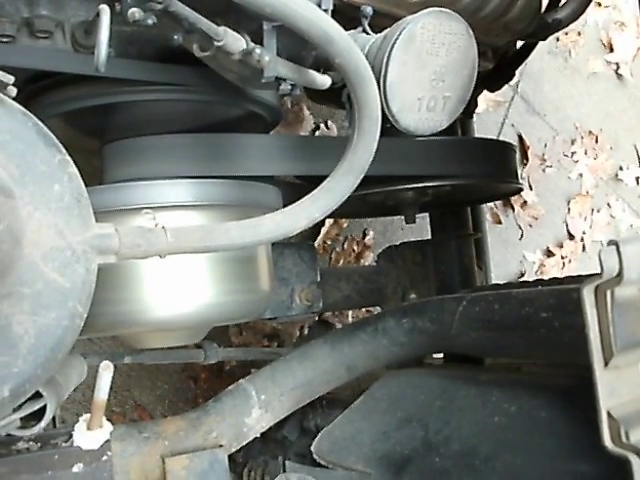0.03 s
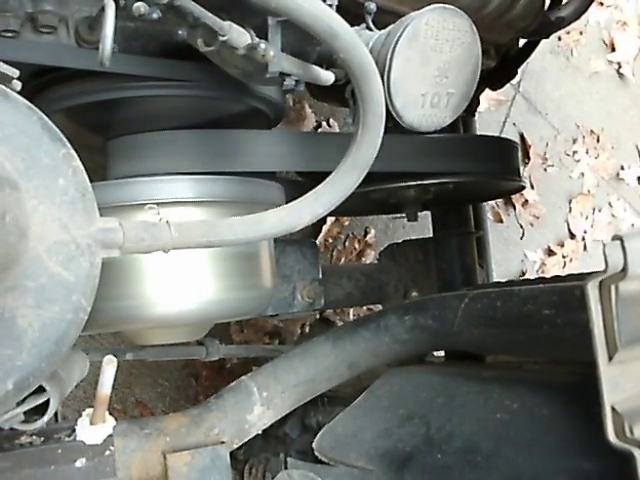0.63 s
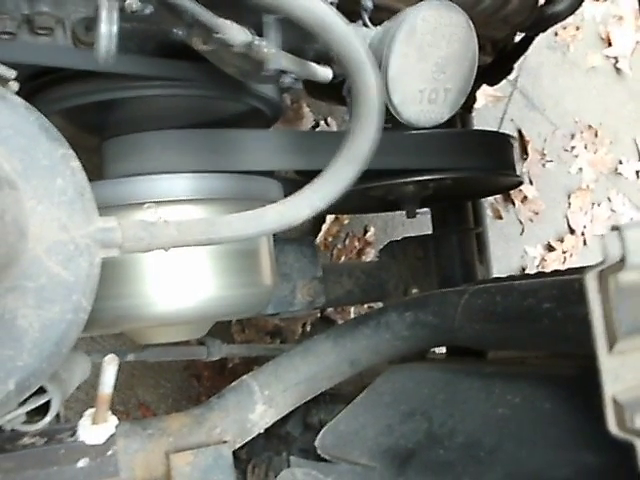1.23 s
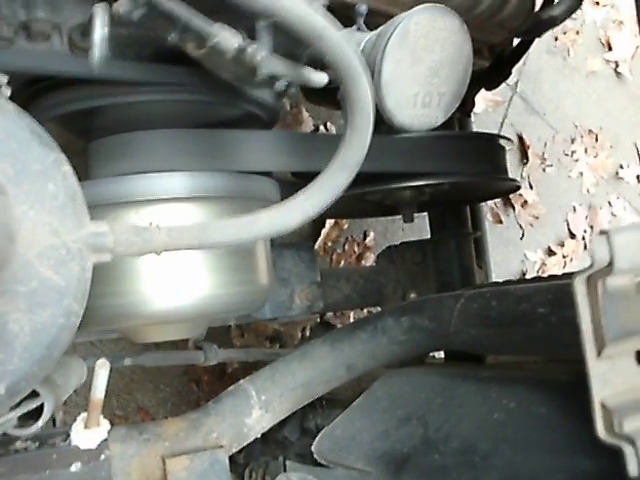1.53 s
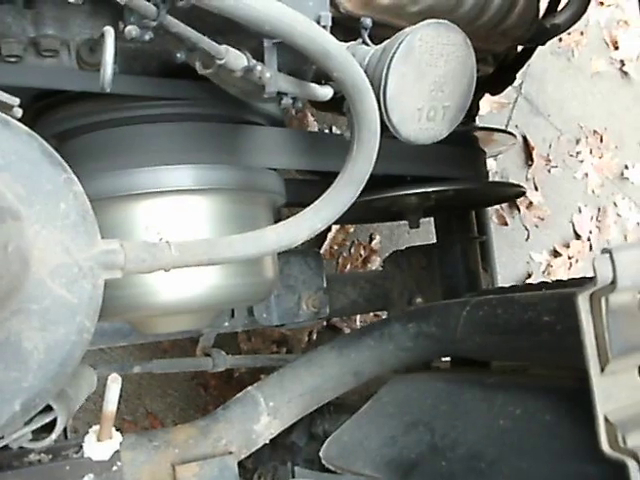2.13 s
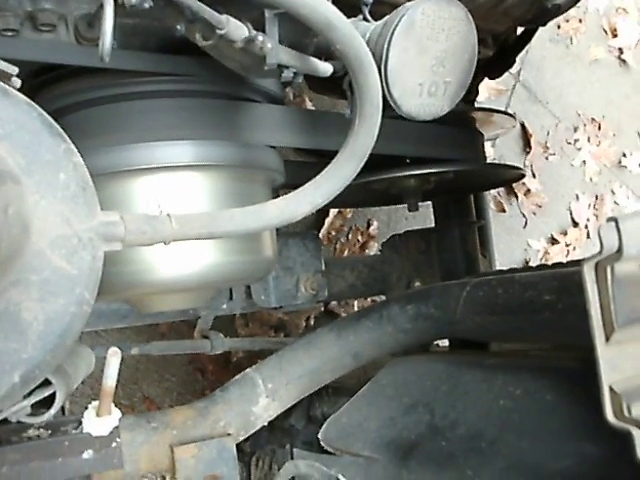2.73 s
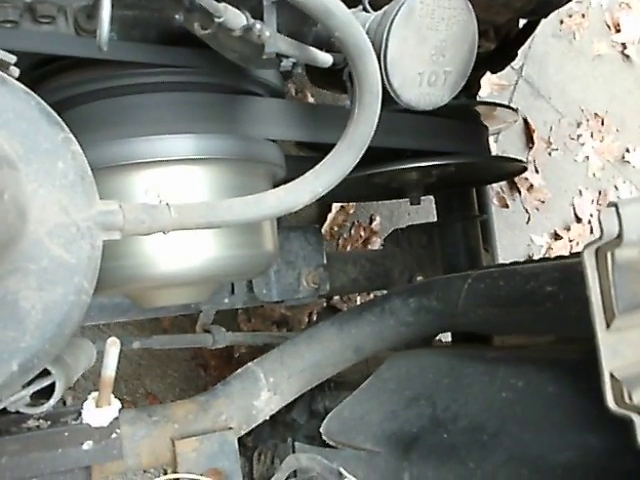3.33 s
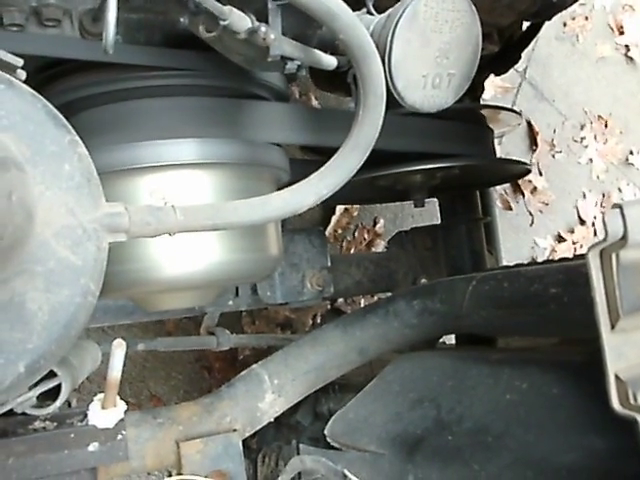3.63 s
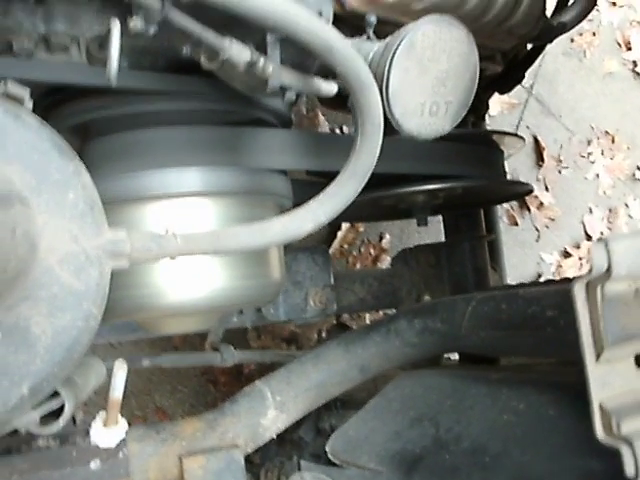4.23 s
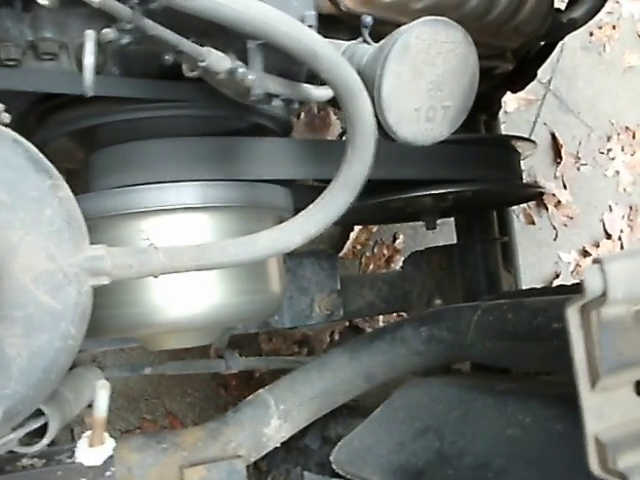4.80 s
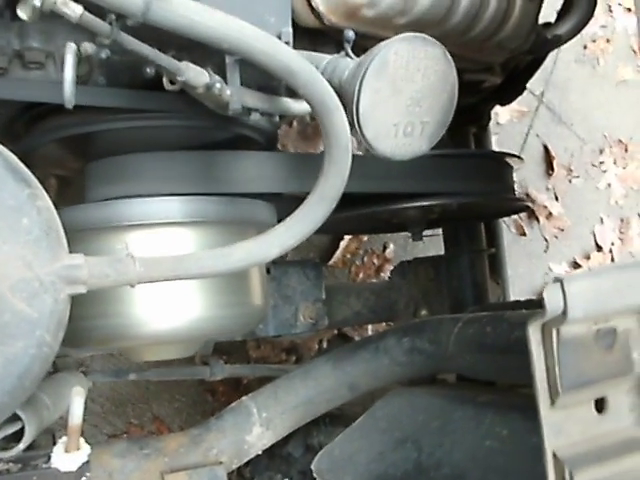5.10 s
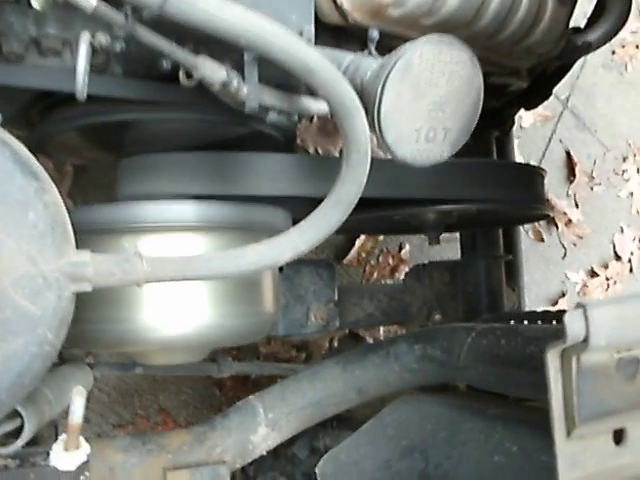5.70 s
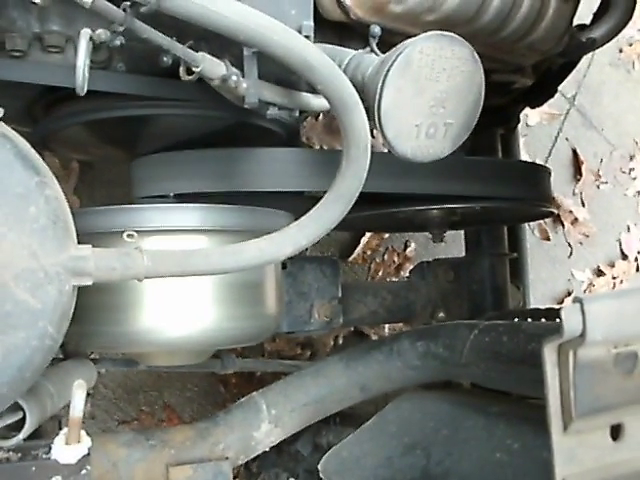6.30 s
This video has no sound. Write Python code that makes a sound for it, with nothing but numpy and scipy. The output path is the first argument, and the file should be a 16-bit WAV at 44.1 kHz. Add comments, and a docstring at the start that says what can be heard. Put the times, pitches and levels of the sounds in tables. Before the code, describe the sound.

Close up, a small engine chugs over, catches with a loud, short rev, then winds down, rattling and knocking to a stop.

```python
"""Golf cart engine, start and coast-down

A single-cylinder four-stroke, heard from just above its belt drive, is cranked, fires and revs for a
second, then coasts with the ignition off. Valve impacts and combustion excite the modes of the case,
air pulses ring the air box and muffler, and at low speed the slack belt drive knocks in the clutches.
The sound is close and dull, and overloads on the firings."""
import sys
import numpy as np
from scipy import signal
from scipy.io import wavfile

SR = 44100
rng = np.random.default_rng(int(sys.argv[2]) if len(sys.argv) > 2 else 0)


def wav_out(sig):
    """Save sig, one row per channel (or a flat mono array), as 16-bit PCM at SR to the path in sys.argv[1]."""
    wavfile.write(sys.argv[1], SR, np.round(np.clip(np.atleast_2d(sig).T, -1, 1) * 32767).astype(np.int16))


N = 288855
T = np.arange(N) / SR

# engine speed, two crank turns to a cycle: (time [s], speed [cycles/s])
SPEED = [(0, 9.646), (.573, 7.365), (1.0, 8.61), (1.03, 9.44), (1.207, 13.484), (1.567, 21.375),
         (1.852, 27.063), (2.009, 25.292), (2.67, 19.847), (3.304, 16.404), (3.694, 14.208), (4.899, 8.775),
         (5.75, 5.092), (6.174, 3.077), (6.36, 2.5), (6.44, .6)]
# spectrum of bright metal contact: (frequency [Hz], level [dB])
CLACK = [(400, -18.5), (1000, -10), (1700, -5), (2200, -1.5), (2650, 0), (3100, 2.5), (3550, -1),
         (3900, -10), (4400, -14.5), (5000, -31.5)]


def amp(db):
    """Amplitude grows tenfold with every 20 dB."""
    return 10 ** (np.asarray(db) / 20)


def unit_rms(x):
    """Normalisation to unit mean power."""
    return x / np.sqrt(np.mean(x ** 2) + 1e-20)


def over_time(rows):
    """Linear interpolation of a time table at every sample."""
    return np.interp(T, *np.transpose(rows))


def speed_gain(rows, column=1):
    """Gain interpolated from a table of levels against engine speed."""
    rows = np.asarray(rows)
    return amp(np.interp(over_time(SPEED), rows[:, 0], rows[:, column]))


def speed_law(db, per_octave_db):
    """Power law of speed: a gain of db at 10 cycles/s, with a constant step per doubling."""
    return amp(db + per_octave_db * np.log2(over_time(SPEED) / 10))


def load_gain(full_db):
    """Level rises in proportion to the pull on the belt, by full_db at full load."""
    # pull of the starter, then of the firing engine: (time [s], load [0-1])
    load = [(0, 0.51), (.3, 0.54), (.6, 0.17), (.85, 0.67), (1.3, 0.7), (1.6, 0.37), (2.2, 0.11), (2.6, 0)]
    return amp(full_db * over_time(load))


def throttle():
    """Gain of the suction, zero while the throttle is shut."""
    # suction through the throttle: (time [s], level [dB])
    suction = [(.9, -25), (1.05, -16), (1.25, -4.5), (1.5, -9), (1.75, -11.5), (1.9, -14), (1.94, -30)]
    return amp(over_time(suction)) * (T > suction[0][0]) * (T < suction[-1][0])


def combustion():
    """Gain of the pressure pulses, zero while the ignition is off."""
    # combustion strength, easing as speed builds: (time [s], level [dB])
    strength = [(1.0, 4.5), (1.3, 3), (1.54, -3), (1.64, -5.5), (1.85, -9.5)]
    ignition = (T > strength[0][0] - .04) & (T < strength[-1][0] + .02)
    return ignition * amp(over_time(strength))


def cycles():
    """Phase, in engine cycles, is the integral of speed."""
    return -.271 + np.cumsum(over_time(SPEED)) / SR


def strokes(phase, scatter_db):
    """Phase-locked impulse train: one uneven pulse per cycle."""
    at = np.flatnonzero(np.diff(np.floor(cycles() - phase)) > 0)
    train = np.zeros(N)
    train[at] = amp(scatter_db * rng.standard_normal(100)[:len(at)])
    return train


def grit(per_s, spread_db):
    """Shot noise: dense, tiny contacts of random size and sign."""
    size = amp(spread_db * np.clip(rng.standard_normal(N), -2, 2))
    return unit_rms(size * rng.choice([-1, 1], N) * (rng.random(N) < per_s / SR))


def chatter(blows, rise_s, decay_s, tail_db, tail_s):
    """Incoherent envelopes add in power: each blow gives a burst, then a slower tail as the body rings on."""
    t = T[:SR // 5]
    shape = (1 - np.exp(-t / rise_s)) * (np.exp(-t / decay_s) + amp(tail_db) * np.exp(-t / tail_s))
    power = signal.oaconvolve(blows ** 2, (shape / shape.max()) ** 2)[:N]
    return np.sqrt(abs(power))


def casing(x, spectrum):
    """Structural resonance: a unit-energy, minimum-phase filter adds modes to a broad spectrum."""
    # modes and notches of crankcase, clutch and covers: (frequency [Hz], width [Hz], gain [dB])
    modes = [(322, 20, 5), (375, 25, 4), (462, 20, 4), (525, 25, 7), (650, 40, 2), (850, 60, 4.5),
             (992, 50, 3), (1236, 45, 5), (1501, 40, 5), (1875, 35, -5), (1930, 40, 8), (2010, 35, 5),
             (2075, 45, -3), (2208, 45, 6), (2260, 35, 3), (2370, 50, 2), (2920, 40, 3), (3026, 65, 7),
             (3267, 60, 4), (3566, 60, 4), (3650, 40, 3), (3890, 70, 3), (4190, 50, -4), (4420, 70, 5)]
    size = 8192
    hz = abs(np.fft.fftfreq(size, 1 / SR))
    knots_hz, knots_db = np.transpose(spectrum)
    db = np.interp(np.log(hz + 1), np.log(knots_hz), knots_db)
    db += sum(peak / (1 + (2 * (hz - centre) / width) ** 2) for centre, width, peak in modes)
    response = np.exp(np.conj(signal.hilbert(np.log(amp(db)))))
    ring = np.fft.ifft(response).real[:size // 2]
    return signal.oaconvolve(x, ring / np.linalg.norm(ring))[:N]


def resonator(drive, modes):
    """Modal superposition: each impulse rings damped sinusoids, the wider modes dying sooner."""
    t = T[:SR // 4]
    ring = sum(amp(db) * np.exp(-np.pi * width * t) * np.sin(2 * np.pi * hz * t)
               for hz, width, db in modes)
    onset = 1 - np.exp(-t / .0058)
    return signal.oaconvolve(drive, ring * onset)[:N]


def impact(clack, thud):
    """Impact excitation: a short clack, brighter at speed, and a longer thud of the case."""
    # spectrum of the clack at low speed: (frequency [Hz], level [dB])
    slow_spectrum = [(400, -22), (1000, -4), (1450, -3), (1750, -2.5), (2200, 2.5), (2650, -1), (3100, 1.5),
                     (3550, -2.5), (3900, -7.5), (4400, -13.5), (5000, -35)]
    # spectrum of the thud: (frequency [Hz], level [dB])
    thud_spectrum = [(150, -37.5), (320, -13), (500, -11.5), (680, -3.5), (900, 0), (1100, -0.5),
                     (1330, -6), (1550, -12.5), (1750, -28), (2600, -39)]
    bright = grit(per_s=12000, spread_db=2)
    bright *= chatter(clack, rise_s=.00058, decay_s=.0094, tail_db=-22, tail_s=.014)
    dull = grit(per_s=8000, spread_db=2)
    dull *= chatter(thud, rise_s=.0014, decay_s=.015, tail_db=-17.5, tail_s=.028)
    slow_share = np.clip(7.75 / over_time(SPEED), 0, 1) ** 2  # 1 below 7.75 cycles/s
    clacks = casing(bright * slow_share, slow_spectrum) + casing(bright * (1 - slow_share), CLACK)
    return clacks + casing(dull, thud_spectrum)


def churn():
    """Friction noise of belt and gears, modulated as compression slows the crank in each cycle."""
    # friction: (speed [cycles/s], rumble level [dB], belt level [dB], gear level [dB])
    levels = [(1, -32, -25, -32.5), (2.85, -34.5, -19.5, -35), (6, -28.5, -15, -28),
              (10.5, -29.5, -13, -23), (16.8, -27.5, -18, -23), (25.4, -25, -10.5, -16)]
    # spectrum of the rumble: (frequency [Hz], level [dB])
    rumble_spectrum = [(15, -25), (40, -10), (100, -5.5), (180, 1.5), (260, -7.5), (400, -7), (600, -8),
                       (900, -44.5)]
    # spectrum of the belt: (frequency [Hz], level [dB])
    belt_spectrum = [(150, -39.5), (350, -10), (500, -6.5), (680, 0.5), (900, -1.5), (1100, -1),
                     (1330, -8.5), (1550, -14), (1750, -33.5), (2600, -37)]
    surge = np.cos(2 * np.pi * (cycles() - .53))
    belt = speed_gain(levels, 2) * load_gain(4.5) * amp(.22 * surge) * grit(per_s=3000, spread_db=1.5)
    gears = speed_gain(levels, 3) * load_gain(5.5) * amp(.85 * surge) * grit(per_s=4000, spread_db=2)
    rumble_gain = (speed_gain(levels, 1) + amp(-7) * throttle()) * amp(1.9 * surge)
    rumble = casing(rumble_gain * grit(per_s=3600, spread_db=3), rumble_spectrum)
    return rumble + amp(-4) * casing(belt, belt_spectrum) + amp(-8) * casing(gears, CLACK)


def shake():
    """Forced vibration: the unbalance of crank and piston drives harmonics of the rotation."""
    # shaking on resonant mounts: (speed [cycles/s], once-a-turn level [dB], twice-a-turn level [dB])
    levels = [(3, -73, -68.5), (9, -57.5, -52.5), (13.5, -57, -39), (17.5, -38, -34.5), (22.2, -45, -37),
              (25.5, -46, -27)]
    crank = 4 * np.pi * cycles()
    once = speed_gain(levels, 1) + speed_law(db=-44, per_octave_db=21) * throttle()
    twice = speed_gain(levels, 2) + amp(-21) * throttle()
    overtones = amp(-10) * np.cos(3 * crank) + amp(-7) * np.cos(4 * crank)
    return np.sqrt(2) * (-once * np.sin(crank) + twice * (np.cos(2 * crank) + overtones))


def clutch():
    """Frictional excitation: the belt keeps the sheaves ringing, and slips once with a squeak."""
    # belt friction: (speed [cycles/s], level [dB])
    rubbing = [(5, -50.5), (13, -21.5), (18, -25), (23, -17.5), (27, -15)]
    # modes of the sheaves: (frequency [Hz], width [Hz], level [dB])
    sheaves = [(521, 130, -2), (848, 78, 3), (1256, 66, 0), (1316, 48, -10.5), (1483, 57, -10.5),
               (1607, 45, -15)]
    # belt squeak: (start [s], length [s], frequency [Hz], level [dB])
    squeak = (.652, .04, 1595, -22)
    ringing = unit_rms(resonator(grit(per_s=2200, spread_db=5), sheaves))
    ringing *= speed_gain(rubbing) * load_gain(8.5)
    start, length, hz, db = squeak
    swell = np.sin(np.pi * np.clip((T - start) / length, 0, 1))
    return ringing + amp(db) * swell * np.sqrt(2) * np.sin(2 * np.pi * hz * T)


def airflow():
    """Cavity resonance: gulps ring the air box under throttle; exhaust puffs ring the muffler."""
    # modes of air box and pipe: (frequency [Hz], width [Hz], level [dB])
    airbox = [(67, 43, 3), (103, 91, 4), (174.2, 28.3, 5), (203, 27, -2.5), (533, 27, -5.5),
              (868, 20, -7.5)]
    # modes of the muffler: (frequency [Hz], width [Hz], level [dB])
    muffler = [(60.4, 26, -14.5), (110, 35, -5), (173.4, 48, 5), (231, 24, -16), (306, 86, -25.5)]
    gulps = strokes(phase=.775, scatter_db=.5)
    overlap = strokes(phase=.5, scatter_db=1)
    blowdown = strokes(phase=.26, scatter_db=1.5)
    pumping = speed_law(db=-16.5, per_octave_db=1) * load_gain(14.5) + amp(-5) * combustion()
    intake = amp(7) * resonator(throttle() * gulps, airbox)
    return intake + resonator(pumping * (overlap + amp(-6) * blowdown), muffler)


def knocks():
    """Backlash: slack in the clutches is taken up with a blow, mostly as compression stalls the crank."""
    # take-ups of slack: (time [s], clack level [dB], thud level [dB])
    take_ups = [(0.142, -17, -11.5), (0.371, -21, -9.5), (0.5, -19.5, -15), (.635, -11, -13.5),
                (0.764, -11, -4.5), (0.884, -17.5, -19), (5.456, -16.5, -11), (5.613, -18.5, -11.5),
                (5.817, -13.5, -3), (6.035, -23, -12.5), (6.057, -10.5, -3), (6.365, -17.5, -16.5),
                (6.39, -34, -15), (6.481, -30, -21)]
    times, clack_db, thud_db = np.transpose(take_ups)
    at = (times * SR).astype(int)
    clack, thud = np.zeros((2, N))
    clack[at], thud[at] = amp(clack_db), amp(thud_db)
    return impact(clack, thud)


def valves():
    """Periodic impacts: valves open and seat at set phases, the main blows harder under load."""
    # valve train blows: (phase [0-1], clack level [dB], thud level [dB], gain at full load [dB])
    timing = [(0.218, -6, -10.5, -2), (.43, -6, -8, 8.5), (0.535, 2.5, 2, 8), (0.719, -3, 0.5, 9.5),
              (.885, -9, -6.5, 2)]
    # force of the blows, greatest when slow: (speed [cycles/s], clack gain [dB], thud gain [dB])
    force = [(2.46, -12.5, -10.5), (4.85, -15.5, -14), (9.15, -15, -17.5), (17.1, -19, -20),
             (27, -21.5, -24.5)]
    clack, thud = np.zeros((2, N))
    for phase, clack_db, thud_db, load_db in timing:
        blows = strokes(phase, scatter_db=1.5) * load_gain(load_db)
        clack += amp(clack_db) * blows
        thud += amp(thud_db) * blows
    return impact(clack * speed_gain(force, 1), thud * speed_gain(force, 2))


def firings():
    """Impulsive excitation: with the ignition on, combustion hammers the case as each cycle starts."""
    # spectrum of the bang: (frequency [Hz], level [dB])
    bang_spectrum = [(300, -28.5), (600, -14.5), (900, -3.5), (1200, -10), (1450, -15), (1800, -22),
                     (3300, -22.5), (5000, -39.5)]
    blows = strokes(phase=0, scatter_db=.5) * combustion()
    boom = grit(per_s=8000, spread_db=.5)
    boom *= chatter(blows, rise_s=.0005, decay_s=.016, tail_db=-32, tail_s=.03)
    crack = grit(per_s=9000, spread_db=.5)
    crack *= chatter(blows, rise_s=.0005, decay_s=.008, tail_db=-22, tail_s=.02)
    return amp(2.5) * casing(boom, bang_spectrum) + amp(-12.5) * casing(crack, CLACK)


def scene():
    """Superposition of all the engine's sources in one channel."""
    return (valves() + knocks() + firings() + airflow() + shake() + churn() + clutch())[None]


def record(dry):
    """Nonlinear overload: compression, saturation, treble cut above about 5 kHz, then hard clipping."""
    pole = np.exp(-1 / (.006 * SR))  # 6 ms power average
    power_db = 10 * np.log10(signal.lfilter([1 - pole], [1, -pole], dry ** 2) + 1e-12)
    threshold_db, ceiling, knee_order = -9.5, 1.06, 6
    compressed = dry / amp(.25 * np.maximum(power_db - threshold_db, 0))
    saturated = compressed / (1 + abs(compressed / ceiling) ** knee_order) ** (1 / knee_order)
    treble_cut = signal.firwin(301, 4920, window=("kaiser", 8), fs=SR)
    final_lowpass = signal.firwin(255, 17000, window=("kaiser", 8), fs=SR)
    dulled = signal.oaconvolve(saturated, treble_cut[None], "same")
    return signal.oaconvolve(np.clip(dulled, -1, 1), final_lowpass[None], "same")


dry = scene()
out = record(dry)
wav_out(out)
```